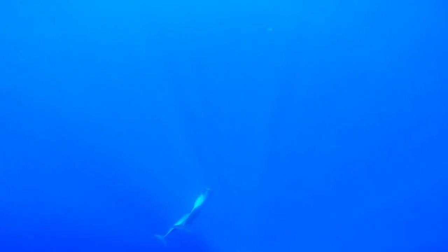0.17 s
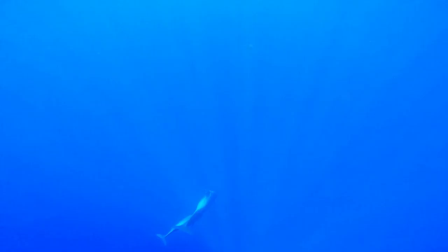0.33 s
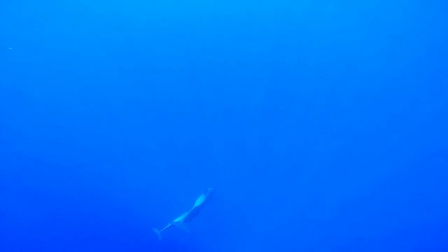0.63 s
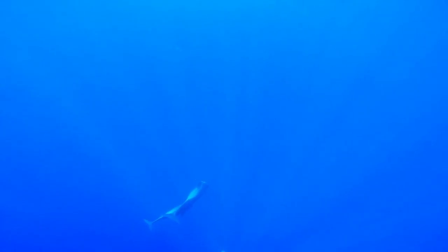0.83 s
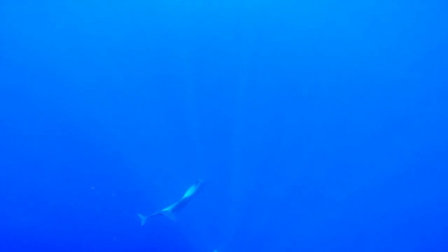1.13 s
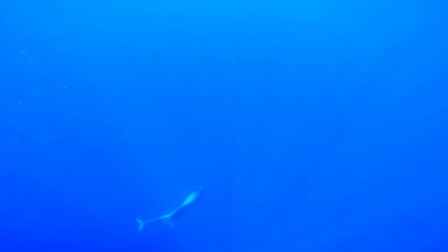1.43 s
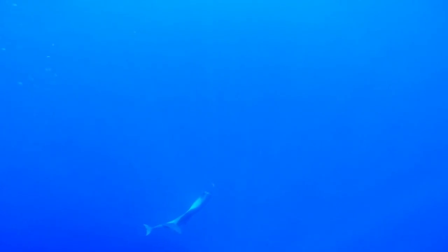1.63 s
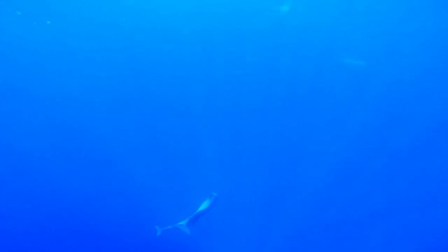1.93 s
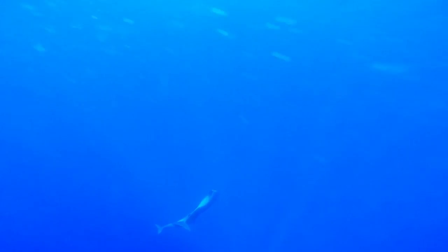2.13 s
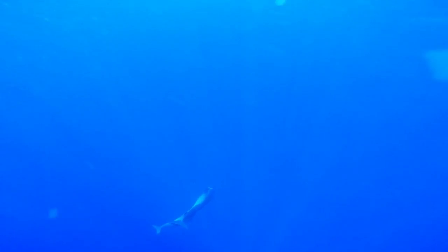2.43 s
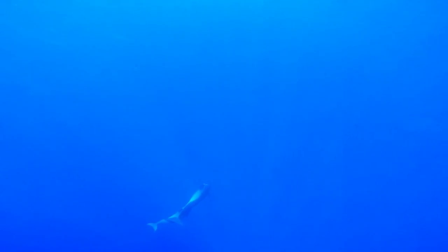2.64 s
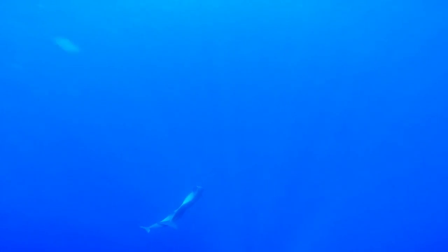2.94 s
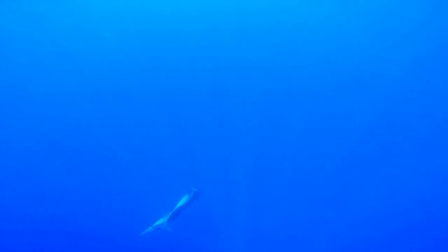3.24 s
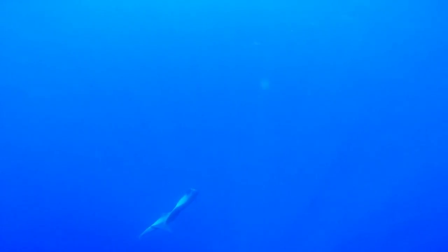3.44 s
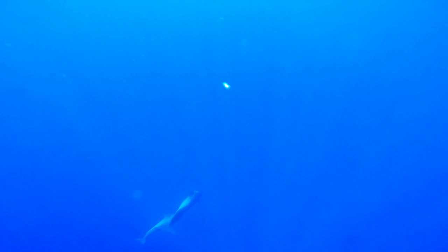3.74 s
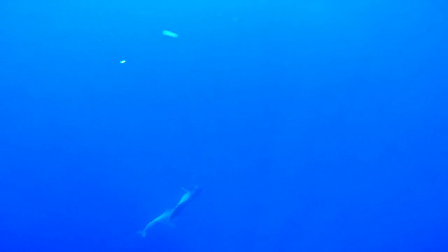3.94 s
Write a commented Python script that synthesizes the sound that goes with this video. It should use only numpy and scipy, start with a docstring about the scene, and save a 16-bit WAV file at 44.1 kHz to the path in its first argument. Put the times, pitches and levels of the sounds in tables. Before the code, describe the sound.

A submerged microphone picks up deep swaying water, soft hiss and a very thin electronic whine. A dolphin squeaks, rasps and trills within the first second. A hard distorted bubble burst follows, then scattered plops and dry clicks. From about 2.8 seconds a nasal buzz cracks into a steady whistle while dense bubbles gurgle and knock hollowly on the housing.

```python
"""Under water in the open sea: moving water rumbles over a faint hiss and a thin electronic whine throughout.
A dolphin squeak, then a hoarse filtered-noise rasp into a two-voiced trill; calls are harmonic stacks on a gliding pitch.
Air bubbles ring as decaying sines of rising pitch amid short clicks; the strongest overload the microphone.
Late on, a buzz breaks into a long whistle while bubbles crowd in and knock on the microphone housing."""
import sys
import numpy as np
from scipy import signal
from scipy.fft import rfft, irfft, next_fast_len
from scipy.io import wavfile
from scipy.ndimage import uniform_filter1d, map_coordinates

SR = 44100
rng = np.random.default_rng(int(sys.argv[2]) if len(sys.argv) > 2 else 0)


def inscribe(sig):
    """Save sig as 16-bit PCM at rate SR to the path in sys.argv[1].

    A 1-D sig is mono; a 2-D sig holds one channel per row.
    Samples are clipped to [-1, 1] before scaling.
    """
    pcm = np.round(np.clip(np.atleast_2d(sig).T, -1, 1) * 32767)
    wavfile.write(sys.argv[1], SR, pcm.astype(np.int16))


N = 180411
TOP_HZ = 16300  # band limit

# bubbles: (time [s], starting pitch [Hz], level [dB])
BUBBLE_EVENTS = [ (.178, 686, -10.5), (.2, 454, -20), (.248, 1352, -6), (.295, 2730, -14),
                 (.345, 1420, -18.5), (.51, 1703, -10), (1.126, 1510, -21), (1.139, 908, -3.5),
                 (1.142, 1586, 7.5), (1.147, 2050, 5.5), (1.165, 1763, 7.5), (1.672, 1200, -10.5),
                 (1.702, 1168, -13), (1.705, 2270, -9.5), (1.732, 1790, -18), (1.746, 3780, -21),
                 (1.87, 1453, -20), (1.924, 754, -23), (1.944, 736, -27.5), (2.166, 1484, -18.5),
                 (2.284, 1720, -21.5), (2.301, 1315, -0.5), (2.356, 3230, -15.5), (2.377, 2570, -12.5),
                 (2.447, 1606, -2), (2.451, 1030, -20), (2.907, 1530, 5), (2.955, 788, 1.5),
                 (2.98, 668, -2.5), (2.983, 1580, -15.5), (3.055, 707, -2), (3.075, 786, -9),
                 (3.094, 833, -5.5), (3.103, 1540, -13.5), (3.12, 523, -8), (3.15, 548, -11),
                 (3.185, 1656, -14.5), (3.198, 511, -5), (3.251, 1480, -14), (3.298, 564.3, 1.5),
                 (3.307, 1830, 0.5), (3.347, 637, -8.5), (3.535, 642, -10), (3.605, 633, -4),
                 (3.679, 1382, 0), (3.691, 2458, -16), (3.701, 428.6, -12.5), (3.719, 1490, -17),
                 (3.794, 489.5, -2.5), (3.815, 590, -4.5), (3.838, 649.3, 3), (3.841, 1410, -2.5),
                 (3.852, 2445, -10), (3.901, 2590, -3), (3.904, 968, -9), (3.91, 683, -10),
                 (3.936, 1221, 1.5), (3.938, 1983, -1.5), (3.94, 702, -6), (4.048, 1555, -16),
                 (4.072, 2766, -13.5)]


def amp(db):
    """Decibels to gain."""
    return 10 ** (np.asarray(db) / 20)


def unit(x):
    """Scale to rms 1."""
    return x / np.sqrt(np.mean(x ** 2) + 1e-20)


def along(points, hz):
    """(frequency [Hz], value) points read on a log frequency axis."""
    f, v = np.transpose(points)
    return np.interp(np.log(hz + 1), np.log(f + 1), v)


def curves(rows):
    """One value per sample for each column after the time."""
    s, *cols = np.transpose(rows)
    return [np.interp(np.arange(N) / SR, s, c) for c in cols]


def ramp(start_s, length_s):
    """0 before start_s, 1 from length_s later."""
    return np.clip((np.arange(N) / SR - start_s) / length_s, 0, 1)


def wobble(rate_hz, size=N):
    """Smooth random curve, rate_hz knots a second."""
    knots = rng.standard_normal(int(size * rate_hz / SR) + 4)
    return map_coordinates(knots, [np.arange(size) * rate_hz / SR])


def filtered(x, response):
    """x through a gain that is a function of frequency."""
    m = next_fast_len(N + SR // 2)
    return irfft(rfft(x, m) * response(np.fft.rfftfreq(m, 1 / SR)), m)[:N]


def noise(spectrum):
    """Coloured noise of rms 1."""
    return unit(filtered(rng.standard_normal(N), lambda hz: amp(along(spectrum, hz))))


def fade(t, t60_s):
    """Exponential decay, 60 dB down at t60_s."""
    return np.exp(-np.log(1000) * t / t60_s)


def held(start_s, end_s, release_s):
    """Envelope of a call: 1 ms start, hold, linear release up to end_s."""
    t = np.arange(N) / SR
    return np.clip((t - start_s) / 0.001, 0, 1) * np.clip((end_s - t) / release_s, 0, 1)


def add(track, s, sound):
    """Mix a sound into the track at time s."""
    start = max(round(s * SR), 0)
    part = track[start:start + len(sound)]
    part += sound[:len(part)]


def whine():
    """Electronics add thin steady sines at multiples of one frequency."""
    whine_hz = 2925.5
    # (multiple, rms level [dB])
    whine_lines = [(2, -68), (3, -74), (4, -71), (5, -70)]
    t = np.arange(N) / SR
    return sum(np.sqrt(2) * amp(db) * np.sin(2 * np.pi * k * whine_hz * t) for k, db in whine_lines)


def water():
    """Water sways past the housing as a deep throb and a low rush, over the steady hiss of the sea."""
    # noise spectra: (frequency [Hz], relative level [dB per Hz])
    rumble_tone = [(8, -56), (14, -5), (21, -6.5), (29, -4.5), (36, -10), (48, -31.5), (80, -48),
                   (400, -130)]
    rush_tone = [(30, -34), (65, 4.5), (115, -2), (220, -4.5), (450, -16.5), (1500, -33), (6000, -100)]
    hiss_tone = [(150, 0.5), (600, 8), (1600, 1), (3000, -5.5), (6000, -10.5), (9000, -15), (13000, -14),
                 (16000, -20)]
    # throb: (time [s], relative level [dB])
    sway_levels = [(0.0, -17.5), (0.35, -22), (1.65, -27.5), (2.06, -19), (2.38, -25.5), (3.74, -21),
                   (4.09, -29)]
    sway_gain_db, rush_db, hiss_db = 1, -42.5, -46.5
    surge_s, surge_width_s, surge_db = 3.76, .08, 17  # one swell of the rush
    rush_swell_db = 2.5  # random swelling

    surge = np.exp(-((np.arange(N) / SR - surge_s) / surge_width_s) ** 2)
    sway = signal.hilbert(noise(rumble_tone))
    throb = unit(sway.real / (np.abs(sway) + 0.16))  # eddies are shed at a fairly even strength
    throb = amp(sway_gain_db + curves(sway_levels)[0]) * throb
    rush = amp(rush_db + surge_db * surge + rush_swell_db * wobble(13)) * noise(rush_tone)
    return throb + rush + amp(hiss_db) * noise(hiss_tone)


def scatter(x, wet_db=-19, t60_s=0.021):
    """The rippled surface and the bubbles return a short, diffuse echo."""
    t = np.arange(SR // 6) / SR
    tail = rng.standard_normal(len(t)) * fade(t, t60_s) * (1 - np.exp(-t / 0.0056))
    return x + amp(wet_db) * signal.fftconvolve(x, tail / np.linalg.norm(tail))[:N]


def knock(t, attack_s=0.00038):
    """The housing rings with its modes, detuned and rebalanced at random each time."""
    # modes: (mean frequency [Hz], mean level [dB], t60 [s])
    housing_modes = [(95, -28.5, 0.36), (246.5, -12.5, 0.16), (333, -13, 0.09), (658.4, 7, 0.028),
                     (1056, 6, 0.015), (1485, 1, 0.064), (1840, -37, 0.11), (2410, 3.5, 0.019),
                     (3700, -44, .012)]
    ring = np.zeros(len(t))
    for hz, db, t60_s in housing_modes:
        level = amp(db + rng.normal(0, 3.3))
        mode_hz = hz * (1 + rng.normal(0, 0.0768))
        ring += level * np.sin(2 * np.pi * mode_hz * t) * fade(t, t60_s)
    return ring * (1 - np.exp(-t / attack_s))


def bumps():
    """Some gulps of air strike the housing, hard or softly, and excite its modes."""
    # (time [s], level [dB])
    bump_events = [(1.141, -5.5), (1.672, -22.5), (1.706, -9.5), (1.73, -9.5), (1.744, -19.5),
                   (2.301, -14.5), (2.954, -9.5), (3.094, -13), (3.306, -8), (3.679, -10), (3.852, -14)]
    out, t = np.zeros(N), np.arange(SR // 5) / SR
    for s, db in bump_events:
        add(out, s, amp(db) * knock(t))
    return out


def clicks(crack_t60_s=0.005, tail_db=-27, tail_t60_s=0.0099, attack_s=0.00016):
    """Clicks and dry pops: a short ring at one pitch, a broadband crack with a faint tail, a housing knock."""
    # (time [s], centre [Hz], level [dB])
    click_events = [ (0.509, 958, -4.5), (0.513, 2630, -7), (0.758, 5200, -23.5), (0.873, 3030, -25.5),
                    (.966, 9400, -10), (1.074, 7460, -11.5), (1.071, 1300, -15), (1.085, 2470, -4),
                    (1.087, 6670, -7), (1.145, 4800, 7), (1.1663, 13960, 9.5), (1.287, 9260, -22),
                    (1.316, 8430, -16.5), (1.376, 2900, -24.5), (1.6749, 7430, -20.5),
                    (1.8717, 10670, -19.5), (1.9235, 4240, -13.5), (1.945, 4250, -8.5),
                    (2.155, 2760, -20.5), (2.18, 5930, -14), (2.213, 3460, -12), (2.331, 2860, -2),
                    (2.393, 4740, -5.5), (2.432, 2810, 8.5), (2.434, 6120, -7), (2.742, 8900, -22.5),
                    (2.81, 2700, -2.5), (2.86, 2260, -15), (2.905, 2180, 0.5), (2.908, 5500, -9.5),
                    (3.1828, 8800, -9), (3.345, 5850, -20), (3.5655, 7600, -11.5), (3.6044, 7320, -7.5),
                    (3.6443, 4770, -20.5), (3.682, 6030, -19.5), (3.841, 4040, -10), (3.901, 3880, -18)]
    # the higher the click, the stronger its crack; the lowest pops barely knock:
    # (centre [Hz], level against the ring [dB])
    crack_levels = [(1000, -37), (5000, -21), (7500, -6.5), (10000, 1)]
    knock_levels = [(900, -48), (2700, -20), (9000, -20)]
    cycles, shortest_s = 32.7, 0.0031  # ring t60: a count of cycles, with a floor

    out, t = np.zeros(N), np.arange(SR // 6) / SR
    for s, hz, db in click_events:
        ring = np.sin(2 * np.pi * hz * t) * fade(t, max(cycles / hz, shortest_s))
        crack = rng.standard_normal(len(t)) * (fade(t, crack_t60_s) + amp(tail_db) * fade(t, tail_t60_s))
        click = ring + amp(along(crack_levels, hz)) * crack + amp(along(knock_levels, hz)) * knock(t)
        add(out, s, amp(db) * click * (1 - np.exp(-t / attack_s)))
    return out


def fragments(count=5, delay_s=.028, centre_hz=1900, below_db=-23, cycles=55):
    """Every bubble sheds a few tiny ones, which tinkle just after it as short decaying sines."""
    out, t = np.zeros(N), np.arange(SR // 12) / SR
    for s, _, db in BUBBLE_EVENTS:
        for late, size, strength in rng.standard_normal((count, 3)):
            hz = centre_hz * np.exp(0.42 * size)
            ring = np.sin(2 * np.pi * hz * t) * fade(t, cycles / hz) * (1 - np.exp(-t / 0.0027))
            level_db = np.clip(db, -10, -3) + below_db + 4 * strength
            add(out, s + delay_s * abs(late), amp(level_db) * ring)
    return out


def bubbles(attack_s=0.00093, waver=0.019, flicker_db=2.8, linger_db=-19, linger_stretch=2.78):
    """Each bubble rings at its breathing mode, rising and lingering faintly; its pinch-off knocks the housing."""
    # (pitch [Hz], knock level against the ring [dB])
    knock_levels = [(500, -21.5), (900, -16.5), (2300, -21.5)]
    # a bigger bubble is lower, rings longer and glides further
    reference_hz = 1000
    reference_t60_s, t60_power = 0.085, 1.22
    reference_rise_oct_per_s, rise_power = 1.25, 1.5
    linger_top_db = -6  # louder bubbles linger no more than one of this level

    out, t = np.zeros(N), np.arange(SR // 2) / SR
    shape, swell = wobble(240), wobble(160)
    for s, hz, db in BUBBLE_EVENTS:
        now = (round(s * SR) + np.arange(len(t))) % N
        size = reference_hz / hz
        t60_s = reference_t60_s * size ** t60_power
        rise_oct_per_s = reference_rise_oct_per_s * size ** rise_power
        # the wobbling shape of the bubble unsettles its pitch and level
        pitch_hz = hz * 2 ** (rise_oct_per_s * np.minimum(t, t60_s / 2)) * (1 + waver * shape[now])
        # a strong swing is damped fast; a gentle one lasts
        strong = amp(db) * fade(t, t60_s)
        gentle = amp(min(db, linger_top_db) + linger_db) * fade(t, linger_stretch * t60_s)
        ring = np.sin(2 * np.pi * np.cumsum(pitch_hz) / SR) * (strong + gentle)
        ring *= 1 - np.exp(-t / attack_s)
        add(out, s, amp(flicker_db * swell[now]) * ring)
        add(out, s, amp(db + along(knock_levels, hz)) * knock(t[:SR // 5]))
    return out


def call(rows, tone, bend=0, drift_db=7.0, overtone_db=0):
    """Vibrating lips: a stack of harmonics on one pitch, which bend pulls up or down by a share."""
    pitch_hz = curves(rows)[0]
    gate = held(rows[0][0], rows[-1][0], release_s=.002)
    on = gate > 0
    pitch_hz = (uniform_filter1d(pitch_hz, SR // 80) * np.clip(1 + bend, .5, 2))[on]
    overtone_db = np.broadcast_to(overtone_db, N)[on]
    phase = 2 * np.pi * np.cumsum(pitch_hz) / SR
    stack = np.zeros(N)
    for k in range(1, int(TOP_HZ / np.median(pitch_hz)) + 1):
        # the beam narrows with frequency, so the highest overtones swell and fade most
        drift = drift_db * np.sqrt(2 * k * pitch_hz / TOP_HZ) * (k > 1) * wobble(14.36, len(pitch_hz))
        db = along(tone, k * pitch_hz) + drift + (k > 1) * overtone_db
        stack[on] += amp(db) * (k * pitch_hz < TOP_HZ) * np.sin(k * phase)
    return np.sqrt(2) * stack * gate


def squeak():
    """A short harmonic call of slightly falling pitch."""
    # (time [s], pitch [Hz], level [dB])
    squeak_path = [(0, 1648, -33.5), (.025, 1637, -34.5), (.042, 1633, -34.5), (.055, 1500, -68)]
    # harmonics: (frequency [Hz], relative level [dB])
    squeak_tone = [(1650, 1.5), (3290, -3.5), (4930, -20), (6580, -19), (8230, -24), (9870, -24),
                   (11500, -26), (14000, -51)]
    return call(squeak_path, squeak_tone) * amp(curves(squeak_path)[1])


def rasp():
    """Hoarse, grainy coloured noise that swells and dies into the trill."""
    # (frequency [Hz], relative level [dB per Hz])
    rasp_tone = [(300, -23), (700, -14), (1100, -9), (1600, 4), (2700, -17.5), (3500, -29), (4300, -15.5),
                 (6000, -47), (7600, -29), (13000, -69.5)]
    start_s, end_s, t60_s = .173, 0.287, 0.093
    start_db, swell_db_per_s = -29.5, 47

    t = np.arange(N) / SR
    swell_db = swell_db_per_s * (np.minimum(t, end_s) - start_s)
    envelope = (t > start_s) * fade(np.maximum(t - end_s, 0), t60_s)
    grain_db = 4 * wobble(180)
    return envelope * amp(start_db + swell_db + grain_db) * noise(rasp_tone)


def trill(rows, tone, sweep, widening, throb_db, jitter):
    """A whistle chopped by a fast throb: each cycle the pitch jumps up, then settles as the level swells."""
    # (time [s], mean throb rate [Hz])
    throb_rates = [(.33, 113), (.43, 118), (.6, 111), (.75, 100), (.82, 88), (.86, 87)]
    rate_hz = curves(throb_rates)[0]
    cycle = np.cumsum(rate_hz * (1 + .03 * wobble(40))) / SR % 1
    # a slower throb leaves time for a wider slide
    depth = np.clip(sweep * (rate_hz.max() / rate_hz) ** widening, 0, .5)
    slide = uniform_filter1d((1 - cycle) ** 2 - 1 / 3, SR // 700)
    bend = depth * slide + jitter * wobble(700)
    level_db = curves(rows)[1] - throb_db * np.cos(2 * np.pi * cycle) + 0.5 * wobble(87.6)
    return call(rows, tone, bend) * amp(level_db)


def two_voiced_trill():
    """A high and a low throbbing voice that overlap, the low one starting later."""
    # voices: (time [s], pitch [Hz], level [dB])
    high_path = [(.305, 3410, -39), (.335, 3690, -29.5), (.39, 3760, -32), (.46, 3813, -31.5),
                 (.54, 3690, -34), (.61, 3574, -35.5), (.68, 3530, -43), (.75, 3300, -55)]
    low_path = [(.575, 3050, -54), (.63, 3000, -45.5), (.68, 2860, -37.5), (.765, 2750, -40.5),
                (.79, 2285, -43.5), (.83, 2030, -43.5), (.865, 2100, -60)]
    # harmonics: (frequency [Hz], relative level [dB])
    high_tone = [(3800, 0), (7500, -15.5), (11000, -35), (15000, -48)]
    low_tone = [(2700, 4), (4300, -4), (5200, -9), (6500, -35), (8200, -10.5), (14000, -43)]
    high = trill(high_path, high_tone, sweep=0.15, widening=1, throb_db=4, jitter=0.0082)
    low = trill(low_path, low_tone, sweep=0.045, widening=10.7, throb_db=6.5, jitter=0.032)
    return high + low


def voice_break(rough, beat_hz):
    """Pitch bend of a breaking voice: it lurches, and a second vibration splits its overtones."""
    beat = np.sin(2 * np.pi * np.cumsum(beat_hz * (1 + .08 * wobble(40))) / SR)
    return rough * (.05 * wobble(80) + .17 * beat)


def squeal():
    """A buzz breaks roughly into a long whistle, which starts with a push and loses overtones near its end."""
    # pitch paths: (time [s], pitch [Hz])
    buzz_path = [(2.82, 757.3), (2.862, 639.8), (2.924, 632.6), (3.042, 605), (3.11, 601.5), (3.15, 624),
                 (3.172, 677), (3.21, 713)]
    whistle_path = [(3.21, 1334), (3.218, 1390), (3.232, 1567), (3.25, 1715), (3.274, 1742), (3.31, 1763),
                    (3.64, 1680), (3.8, 1668)]
    # harmonics: (frequency [Hz], relative level [dB])
    buzz_tone = [(610, 14), (1220, -14.5), (1820, -6.5), (2430, -3), (3040, -1.5), (3650, -2), (4250, -7.5),
                 (4870, -26), (6100, -9.5), (6700, -16.5), (7300, -7), (7900, -19), (11600, -21.5),
                 (15000, -38)]
    whistle_tone = [(1700, -14), (3450, -10.5), (5170, -24), (6900, -32.5), (8600, -29), (10300, -35.5),
                    (13700, -37), (15500, -60)]
    # (time [s], roughness [0-1])
    break_roughness = [(2.82, .15), (2.86, .01), (3.15, .01), (3.172, .45), (3.22, .4), (3.25, .02)]
    buzz_db, buzz_release_s = -34, 0.0083
    whistle_db, whistle_release_s = -22, 0.0072
    dull_at_s, dull_over_s, dull_db = 3.66, 0.076, 20
    push_db, push_s = 9, .015

    rough = curves(break_roughness)[0]
    overtone_db = -dull_db * ramp(dull_at_s, dull_over_s)
    start_db = push_db * (1 - ramp(whistle_path[0][0], push_s))
    buzz = call(buzz_path, buzz_tone, voice_break(rough, beat_hz=269), drift_db=4)
    whistle = call(whistle_path, whistle_tone, voice_break(rough, beat_hz=620), drift_db=4,
                   overtone_db=overtone_db)
    buzz *= amp(buzz_db) * held(buzz_path[0][0], buzz_path[-1][0], buzz_release_s)
    whistle *= amp(whistle_db + start_db) * held(whistle_path[0][0], whistle_path[-1][0], whistle_release_s)
    stutter = amp(5 * rough * wobble(150))
    return stutter * (buzz + whistle)


def off_axis(x):
    """The squealing animal faces away, so its highest overtones arrive weaker."""
    # (frequency [Hz], gain [dB])
    off_axis_gain = [(5500, 0), (9000, -3), (14000, -4)]
    return filtered(x, lambda hz: amp(along(off_axis_gain, hz)))


def dolphins():
    """A short squeak, a hoarse start into a two-voiced trill, then the long squeal."""
    return squeak() + rasp() + two_voiced_trill() + off_axis(squeal())


def scene():
    """Everything reaches one microphone; only bubbles, fragments, bumps and clicks are scattered."""
    echoed = scatter(bubbles() + bumps() + fragments() + clicks())
    return (echoed + dolphins() + water() + whine())[None]


def record(dry):
    """Loud peaks clip the microphone with a slightly rounded knee; nothing is kept above the band limit."""
    clipped = dry[0] / (1 + np.abs(dry[0]) ** 12) ** (1 / 12)
    return filtered(clipped, lambda hz: hz < TOP_HZ)[None]


dry = scene()
out = record(dry)
inscribe(out)
```